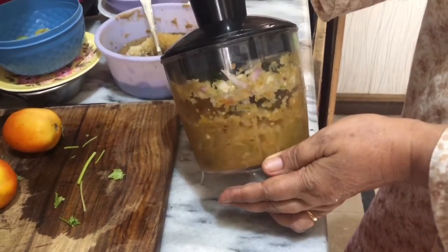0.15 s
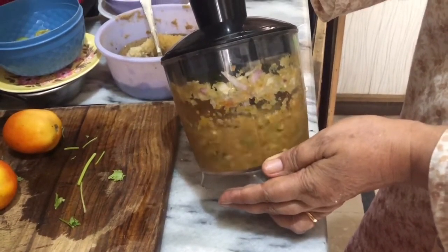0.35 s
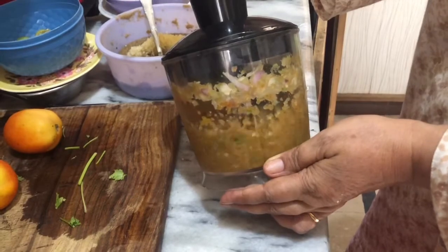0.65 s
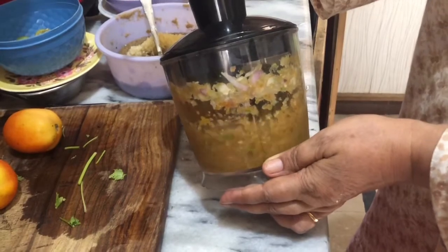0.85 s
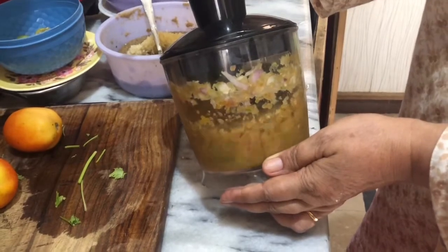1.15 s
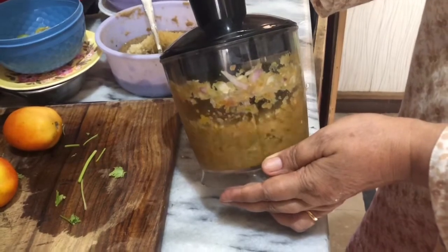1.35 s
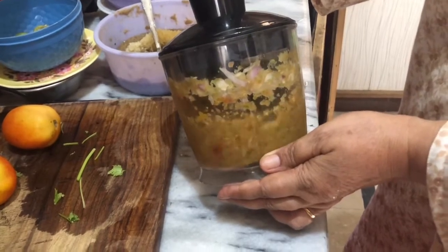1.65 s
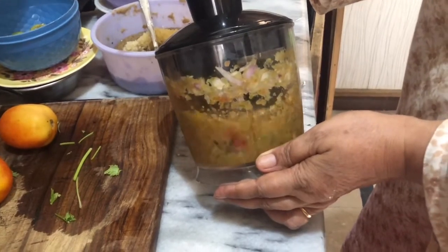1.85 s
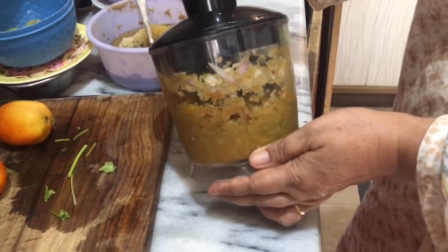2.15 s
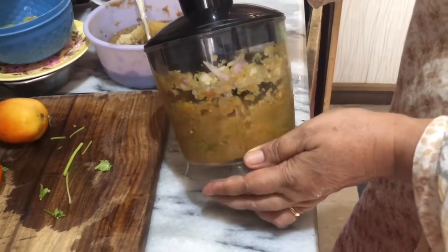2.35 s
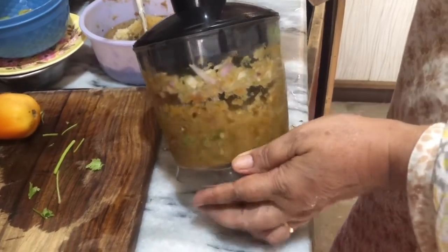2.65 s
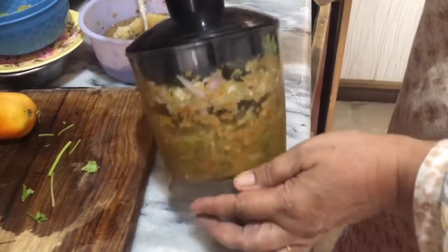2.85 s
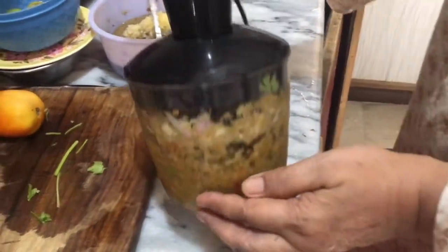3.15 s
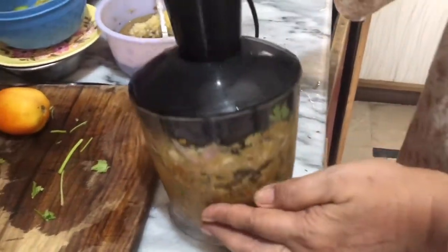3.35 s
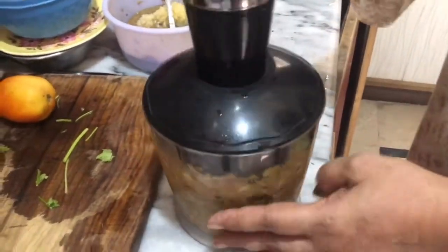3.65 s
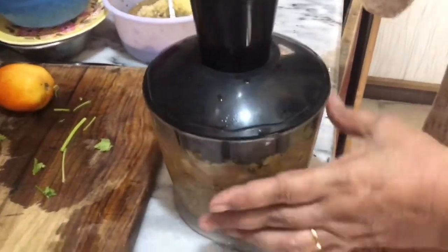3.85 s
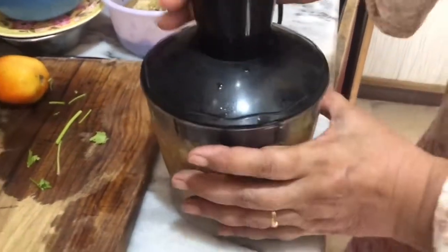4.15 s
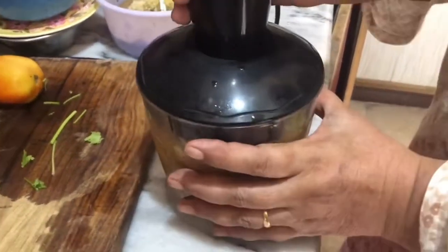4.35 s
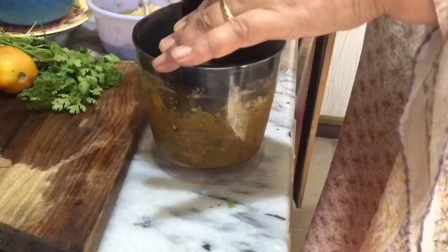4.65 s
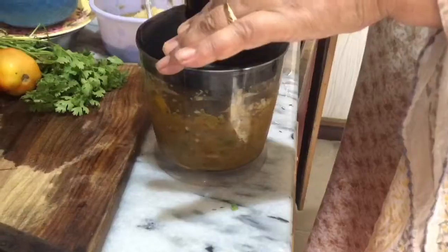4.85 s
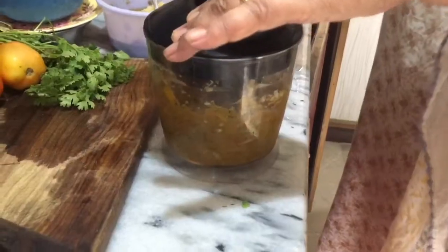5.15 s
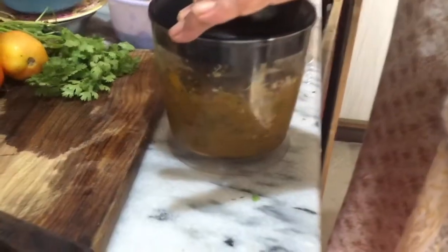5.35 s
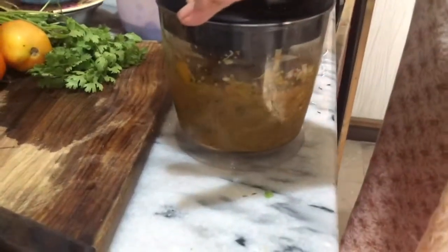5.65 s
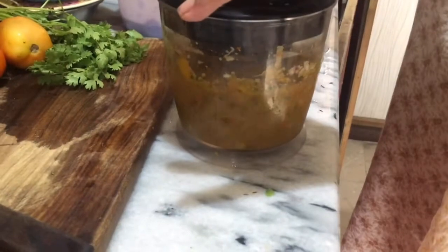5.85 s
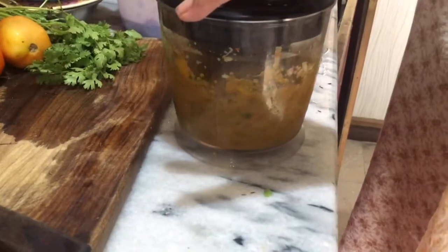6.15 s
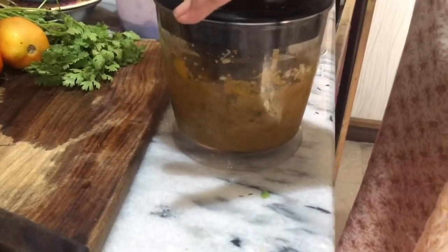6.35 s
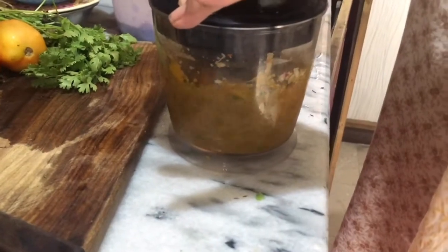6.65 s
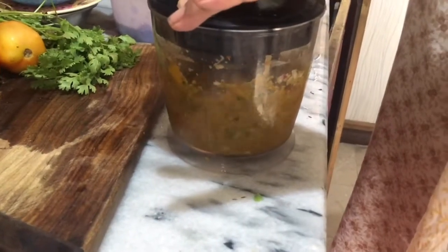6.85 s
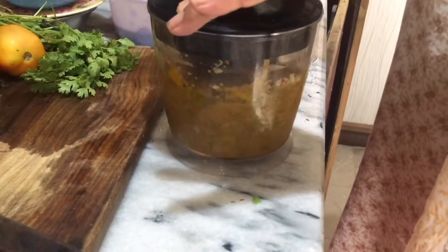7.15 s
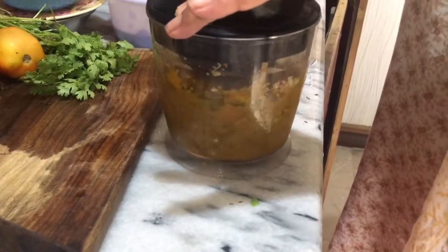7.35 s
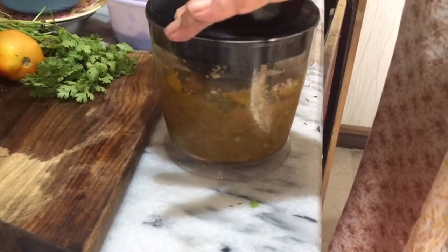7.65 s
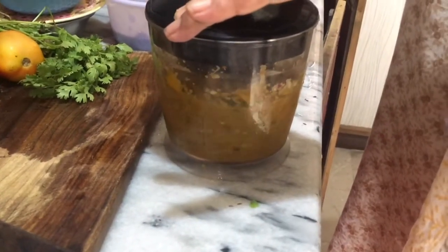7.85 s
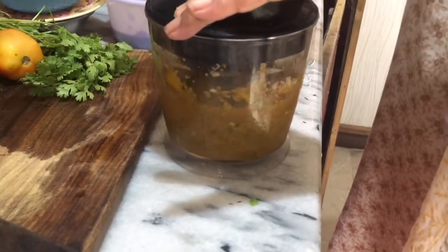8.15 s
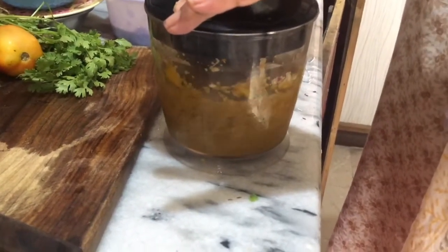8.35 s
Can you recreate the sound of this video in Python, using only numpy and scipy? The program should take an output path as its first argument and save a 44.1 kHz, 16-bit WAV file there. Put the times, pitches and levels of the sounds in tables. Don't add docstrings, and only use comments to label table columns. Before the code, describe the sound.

From 0 to about 2.9 s, a small geared electric chopper runs in a plastic bowl of wet mixture: a moderately loud, gritty buzz with a thin gear whine, throbbing and knocking rapidly, over twenty times a second, with slight pitch wavering. At 2.9 s the switch releases with a low knock; the motor slides down in pitch, dulls and fades by about 3.5 s. Quiet room air and faint appliance hum remain. Small hand sounds follow: a skin tap at 3.6, dull fingertip taps at 3.7 and 3.9, soft rubbing with a slight squeak around 4.3 to 4.45. At 4.6 s an abrupt cut starts a much louder run, already at full speed, bowl on the counter: dense grinding and a strong, piercing gear whine near 2.8 kHz, fluttering and drifting slightly, continuous to the end near 8.5 s, with a low counter thud at about 8.4.

```python
import sys
import numpy as np
from scipy import signal
from scipy.fft import rfft, irfft
from scipy.io import wavfile

SR = 44100
rng = np.random.default_rng(int(sys.argv[2]) if len(sys.argv) > 2 else 0)


def inscribe(sig):
    pcm = np.round(np.clip(np.atleast_2d(sig).T, -1, 1) * 32767)
    wavfile.write(sys.argv[1], SR, pcm.astype(np.int16))


def boost(x):
    u = np.asarray(x, float) / 20
    return 10 ** u


N = 374850
TIME = np.arange(N) / SR
CHANGE_S = 4.5927
GEAR = 94 / 11


def rms_one(x):
    return x / np.sqrt(np.mean(x ** 2) + 1e-20)


def drift(rate):
    r = np.exp(-2 * np.pi * rate / SR)
    return rms_one(signal.lfilter([1], [1, -2 * r, r * r], rng.standard_normal(N + SR))[SR:])


def filtered(x, order, edges_hz, kind="low"):
    return signal.sosfilt(signal.butter(order, edges_hz, kind, fs=SR, output="sos"), x)


def body(x, colour, modes, size=16384):
    hz = np.arange(size // 2 + 1) * SR / size + 1
    colour_hz, colour_db = np.transpose(colour)
    level_db = np.interp(np.log(hz), np.log(colour_hz), colour_db)
    for centre_hz, width, rise_db in modes:
        level_db = level_db + rise_db / (1 + (2 * (hz - centre_hz) / width) ** 2)
    cepstrum = irfft(np.log(boost(level_db)))
    cepstrum[1:size // 2] *= 2
    cepstrum[size // 2 + 1:] = 0
    return signal.fftconvolve(x, irfft(np.exp(rfft(cepstrum))))[:N]


# frequency in Hz, level in dB per Hz.
ROOM = [(24, -29), (50, -28), (87, -5.5), (204, -12.5), (337, -6.5), (392, -9), (516, -12), (570, -11.5),
        (1180, -18), (1630, -18.5), (2320, -24), (2500, -24.5), (16000, -46)]
# centre in Hz, width in Hz, rise in dB.
ROOM_MODES = [(100, 15, 7.5), (167, 28, 1.5), (265, 20, 14), (750, 61, 8), (1190, 55, 5)]
# frequency in Hz, level in dB rms.
HUM = [(96.9, -62.5), (177.6, -64.5), (242.2, -70), (263.8, -71), (522.2, -67), (726.7, -78), (1163, -70)]


def kitchen():
    air = rms_one(body(rng.standard_normal(N), ROOM, ROOM_MODES)) * boost(-51.5 + 1.0 * drift(3.1))
    hum = np.zeros(N)
    for hz, hum_db in HUM:
        level = boost(hum_db + 1.5 + 1.9 * drift(4))
        hum += level * np.sin(2 * np.pi * hz * TIME + 0.34 * drift(2.4))
    after = TIME > CHANGE_S
    sounding = (TIME < CHANGE_S - .004) | after
    return (air + hum) * boost(18.5 * after) * sounding


def churning(motor, blade, swell, luck, throb_db, tooth_db):
    teeth = np.cos(2 * np.pi * 2 * (motor - blade)) + np.cos(2 * np.pi * motor)
    throb = throb_db * swell * (1 + 0.15 * luck[:, 0])
    return rng.standard_normal(N) * boost(throb + tooth_db * teeth + 0.62 * drift(9.2))


def shaft_knocks(blade, luck):
    struck = np.diff(np.floor(blade + .1 + .04 * luck[:, 0]), prepend=0) > 0
    strength = struck * boost(2.2 * np.minimum(luck[:, 1], 1))
    decay_s = 0.0036
    burst = signal.lfilter([1], [1, -np.exp(-1 / (decay_s * SR))], strength) * rng.standard_normal(N)
    return signal.lfilter([.5], [1, -.5], burst)


def gear_song(motor, blade, swell, lines, lines_db, shake_db, waver_db, blur):
    play = blur * drift(13.4) + 0.028 * drift(2.64)
    rattle = 0.23 * drift(60)
    sing = np.zeros(N)
    for (order, side), line_db in zip(lines, lines_db):
        waver = waver_db * (.5 + (order > 2) * (side != 2)) * drift(3.4)
        shake = shake_db * (order == 1)
        throb = 4.9 * (swell - .5) * (order in (4, 23))
        turns = order * (motor + play) + side * (blade - .1) + rattle * (order > 20)
        sing += boost(line_db + 2.5) * boost(waver + shake + throb) * np.cos(2 * np.pi * turns)
    return filtered(sing, 4, 119, "high")


def chopper(angle, speed, level_db, swing_db, bright_db, shake_db, tuned, colour, modes, lines, lines_db,
            throb_db, knock_db, tooth_db, waver_db, blur):
    motor = np.cumsum(speed) / SR
    blade = motor / GEAR + angle
    luck = rng.standard_normal((400, 2))[np.floor(blade + .5).astype(int)]
    swell = np.exp(0.87 * (np.cos(2 * np.pi * blade) - 1))
    churn = churning(motor, blade, swell, luck, throb_db, tooth_db)
    drive = rms_one(churn) + boost(knock_db) * shaft_knocks(blade, luck)
    resonant = body(drive, colour, modes)
    plain = boost(2.0) * body(drive, colour, [])
    noise = tuned * resonant + (1 - tuned) * plain
    dull = filtered(noise, 2, 6500)
    scale = np.std(filtered(noise, 2, [300, 2500], "band"))
    grind = boost(level_db) * (dull + (noise - dull) * boost(bright_db)) / scale
    sing = gear_song(motor, blade, swell, lines, lines_db, shake_db, waver_db, blur)
    return (grind + sing) * boost(swing_db)


# time in seconds, speed in turns per second.
HELD_SPEED = [(0.0, 246.8), (0.8, 253.6), (1.35, 248.6), (2.3, 252.4), (2.9, 250.4)]
# frequency in Hz, level in dB per Hz.
HELD_COLOUR = [(29, -66), (50, -38), (85, -13.5), (198, -10), (240, -9.5), (353, -2), (398, -10),
               (1180, -2.5), (2110, -6.5), (2810, -5), (3500, -6.5), (5810, -9), (14200, -19.5),
               (16000, -17)]
# centre in Hz, width in Hz, rise in dB.
HELD_MODES = [(350, 240, 5), (782, 38, 5.5), (1203, 170, 3.5), (1895, 60, 6), (2120, 180, -3),
              (2770, 210, 5), (3060, 320, 6), (4440, 250, 2.5), (5770, 790, 5.5), (6600, 400, -1),
              (7000, 230, 5), (7800, 440, 6), (10650, 500, 6.5), (12500, 700, 6)]
HELD_LINES = [(1, -1), (1, 0), (1, 1), (2, -1), (3, -1), (11, 1), (11, 2), (11, 3), (23, 1)]
HELD_LINES_DB = [-70, -47, -57, -61, -51, -51, -48, -51, -53]


def held_run():
    coasting = np.maximum(TIME - 2.911, 0)
    slowing = np.exp(-coasting / 0.2582)
    speed = np.interp(TIME, *np.transpose(HELD_SPEED)) * slowing
    fade_db = -168 * coasting ** 2 - 80 * np.maximum(coasting - 0.35, 0)
    dulling_db = -70 * coasting ** 2
    shudder_db = 8.5 * (1 - np.exp(-coasting / 0.055))
    tuned = np.exp(-coasting / .1)
    throb_db = 2.5 + 3 * (1 - slowing)
    return chopper(-.46, speed, -32.5, fade_db, dulling_db, shudder_db, tuned,
                   HELD_COLOUR, HELD_MODES, HELD_LINES, HELD_LINES_DB,
                   throb_db=throb_db, knock_db=6.0, tooth_db=1.0, waver_db=2.5, blur=0.011)


# start in seconds, peak in dB, ring in Hz, 60 dB decay time in seconds.
KNOCKS = [
    (2.913, -20, 232, 0.098),
    (2.93, -37, 95, .2),
    (3.411, -42, 270, .04),
    (3.7235, -38, 520, .04),
    (3.9423, -40, 900, .02),
    (3.9445, -35, 235, .07),
    (8.44, -19, 96, .3),
]


def hand_knocks():
    out = np.zeros(N)
    for s, peak_db, hz, t60 in KNOCKS:
        age = np.maximum(TIME - s, 0)
        rise = 1 - np.exp(-age / min(0.0035, 1 / hz))
        out += rise * boost(peak_db - 60 * age / t60) * np.sin(2 * np.pi * hz * age)
    return out


# start in seconds, length in seconds, level in dB rms,
# low edge in Hz, high edge in Hz.
RUBS = [
    (3.584, 0.0098, -48, 1500, 4800),
    (3.585, .008, -49, 6500, 11000),
    (3.7235, .004, -64, 2000, 10000),
    (3.941, .004, -60, 6000, 11000),
    (4.28, .05, -68, 1800, 5000),
    (4.39, .06, -59, 2500, 11000),
    (4.395, .05, -66, 3500, 3900),
    (4.44, .012, -62, 4000, 9000),
]


def skin_rubs():
    out = np.zeros(N)
    white = rng.standard_normal(N)
    for s, length, rub_db, low_hz, high_hz in RUBS:
        i, n = int(s * SR), int(length * SR)
        hiss = filtered(white[i - 999:i + n], 2, [low_hz, high_hz], "band")[-n:]
        shape = np.sqrt(np.hanning(n)) if length > .03 else np.linspace(1, 0, n)
        out[i:i + n] += boost(rub_db) * rms_one(hiss) * shape
    return out


# start in seconds, peak in dB, low edge in Hz, high edge in Hz.
TAPS = [
    (3.7237, -38, 350, 1300),
    (3.7275, -42, 350, 900),
    (3.9412, -37, 500, 2600),
    (3.9435, -40, 200, 1500),
]


def wall_taps():
    out = np.zeros(N)
    for s, peak_db, low_hz, high_hz in TAPS:
        click = filtered(signal.unit_impulse(SR // 20), 3, [low_hz, high_hz], "band")
        out[int(s * SR):][:len(click)] += boost(peak_db) * click / click.max()
    return out


# time in seconds, speed in turns per second.
DOWN_SPEED = [(4.6, 254.6), (4.8, 256.0), (5.05, 260.0), (5.28, 259.6), (5.55, 256.8), (5.9, 254.9),
              (6.37, 259.8), (6.56, 256.6), (6.8, 257.3), (7.02, 252.9), (7.28, 257.5), (7.8, 257.0),
              (8.5, 258.8)]
# frequency in Hz, level in dB per Hz.
DOWN_COLOUR = [(24, -42), (40, -42), (180, -20), (249, -14.5), (542, -13), (942, -8.5), (1090, -11),
               (2380, -7), (2910, -6.5), (3560, -19), (6020, -8.5), (8770, -22), (12100, -20), (16000, -27)]
# centre in Hz, width in Hz, rise in dB.
DOWN_MODES = [(378, 100, 5.2), (492, 26, 3.8), (760, 114, 2.7), (947, 50, 4.4), (2130, 27, 0.83),
              (2986, 194, 5), (3314, 310, 7.2), (3790, 210, 8.6), (4050, 130, 5.1), (5590, 60, 2),
              (5896, 53, 4.1), (7520, 600, 7.8), (9200, 210, 2), (11550, 1400, 3.4)]
DOWN_LINES = [(1, -1), (1, 0), (1, 2), (2, -1), (3, -4), (3, -2), (3, -1), (4, -5), (4, -3), (4, -2),
              (6, -6), (11, 0), (11, 1), (11, 2), (11, 3), (11, 8), (23, 1), (23, 2)]
DOWN_LINES_DB = [-39.5, -32, -36, -40, -40, -34.5, -38, -51, -31.5, -33, -35.5, -29.5, -31, -14, -22, -26.5,
                 -25, -30]


def counter_run():
    after_change = np.maximum(TIME - CHANGE_S, 0)
    running = TIME > CHANGE_S - .3
    speed = np.interp(TIME, *np.transpose(DOWN_SPEED)) * running
    settling_db = -1.5 * np.exp(-after_change / 0.28)
    run = chopper(.87, speed, -15.5, settling_db, 0, 0, 0.97,
                  DOWN_COLOUR, DOWN_MODES, DOWN_LINES, DOWN_LINES_DB,
                  throb_db=2.5, knock_db=5.5, tooth_db=0.5, waver_db=1.56, blur=0.0068)
    return run * (TIME > CHANGE_S)


def scene():
    hands = hand_knocks() + skin_rubs() + wall_taps()
    return (kitchen() + held_run() + hands + counter_run())[None]


def top_cut(x):
    return signal.sosfilt(signal.butter(12, 16380, fs=SR, output="sos"), x)


def record(dry):
    clipped = np.clip(dry, -.92, .92)
    low_pass = signal.ellip(12, .5, 75, 15720, fs=SR, output="sos")
    finished = signal.sosfilt(low_pass, clipped)
    return top_cut(finished)


dry = scene()
out = record(dry)
inscribe(out)
```